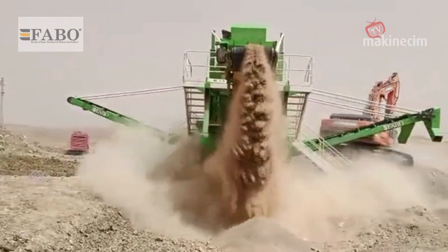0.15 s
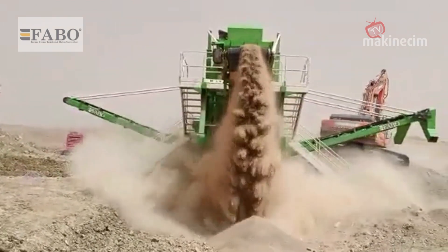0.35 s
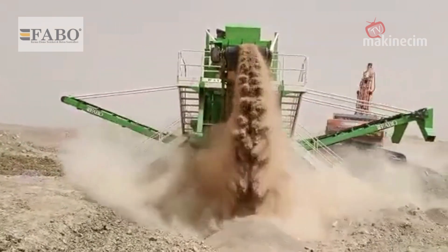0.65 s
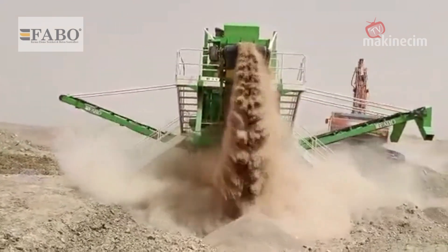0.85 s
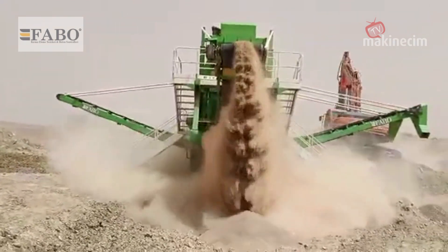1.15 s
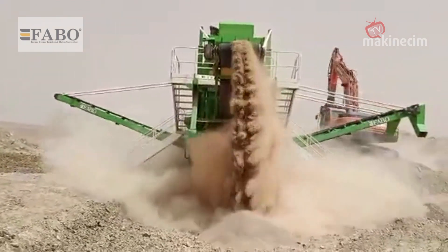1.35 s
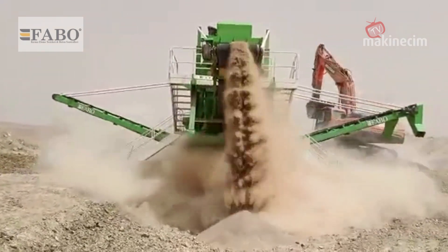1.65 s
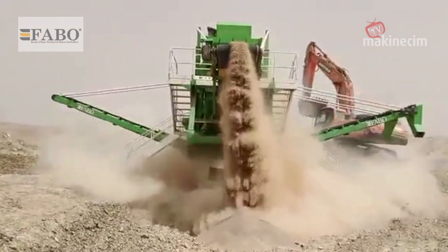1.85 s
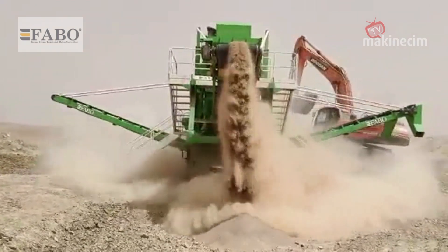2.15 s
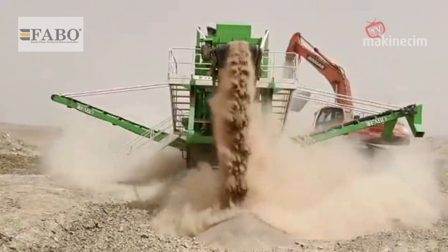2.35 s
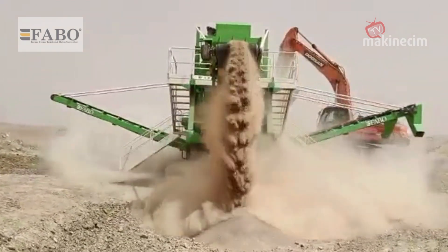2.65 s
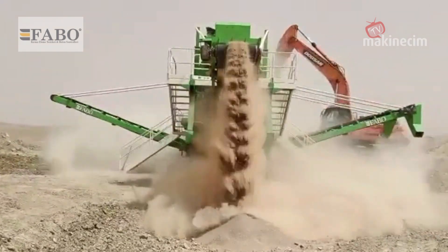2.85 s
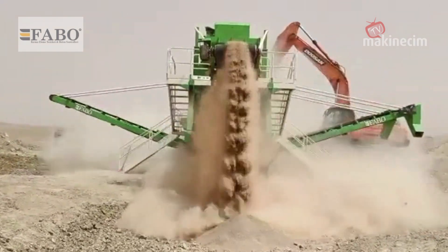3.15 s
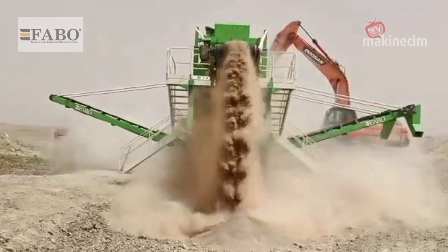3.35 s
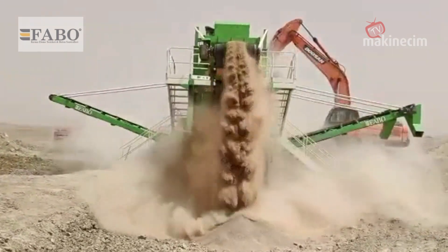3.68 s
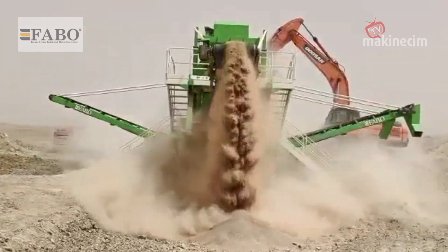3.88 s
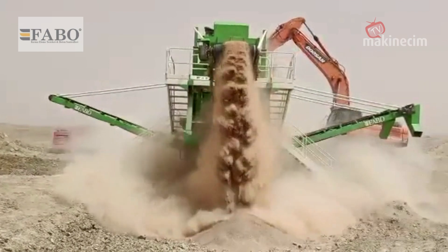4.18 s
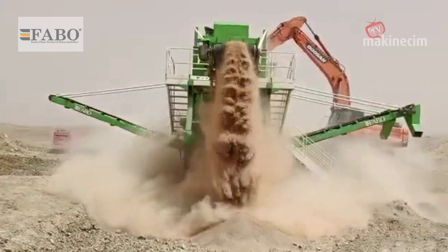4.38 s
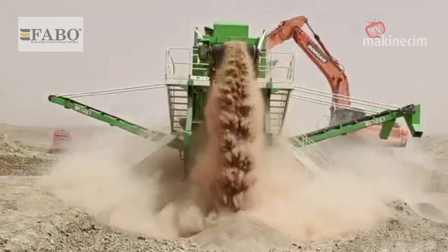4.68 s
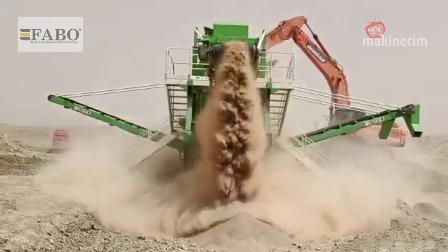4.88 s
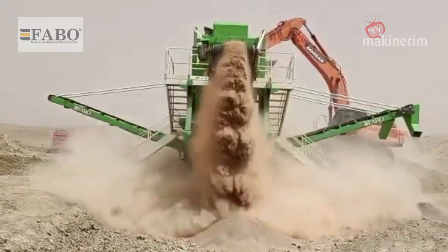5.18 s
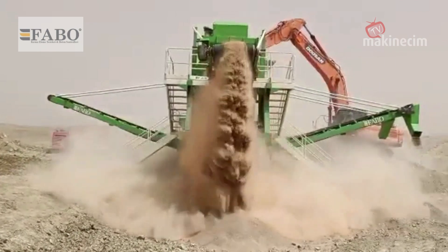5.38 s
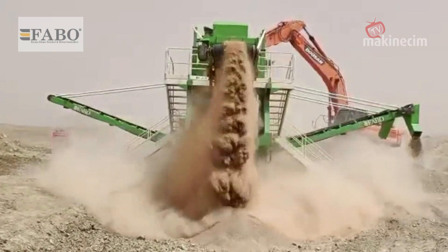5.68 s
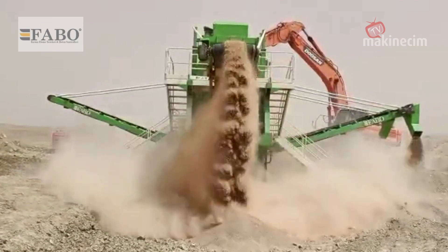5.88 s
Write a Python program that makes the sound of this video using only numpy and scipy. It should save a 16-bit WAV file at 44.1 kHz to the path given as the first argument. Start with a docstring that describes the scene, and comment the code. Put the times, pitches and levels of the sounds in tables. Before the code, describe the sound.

For about six seconds, gravel and sand pour continuously onto a heap in an open quarry. The stream is close on the left, a dense midrange clatter with bright sandy hiss; on the right it is faint, swelling and ebbing. Behind it a screening plant drones softly, its steel panels ringing. Larger stones clack sharply on the left, notably near 0.9, 1.3, 2.0, 2.2, 3.4, 3.7 and 5.7 s. Wind rumbles on both microphone sides: left thumps cluster from 0.1 to 0.5 s, then hard right-side blows near 1.4, 1.9 and 2.1-2.3 s. After a calmer moment around 2.5 s, crowded buffeting returns from 3.0 to 3.7 s and 4.0 to 5.4 s, with a strong left thump near 4.6 s and heavy right ones around 5.0 and 5.9 s. The pour brightens slightly at the end, still running. Dry and open, with only faint ground reflections.

```python
"""Gravel and sand pour off a conveyor onto a heap in an open quarry, close on the left, faint on the right.
Dense random impacts, shaped in colour, make the pour; its level swells and ebbs, mostly on the right,
and big stones clack. Behind it the screening plant drones: knocks keep narrow resonances ringing.
Filtered noise makes a steady breeze on the two microphone ports; gusts and pressure pulses buffet them,
the right one harder."""
import sys
import numpy as np
from scipy import signal
from scipy.fft import rfft, irfft
from scipy.io import wavfile
from scipy.ndimage import uniform_filter1d, minimum_filter1d

SR = 44100
rng = np.random.default_rng(int(sys.argv[2]) if len(sys.argv) > 2 else 0)


def transcribe(u):
    """Save the signal u as a 16-bit wav file named by the first command-line argument.

    u: samples, shape (n,) or (channels, n), limited to [-1, 1]; the rate is SR.
    q: integer samples, one column per channel.
    """
    v = np.clip(np.atleast_2d(u).T, -1, 1)
    q = np.round(v * 32767).astype(np.int16)
    wavfile.write(sys.argv[1], SR, q)


N = 265923
TIME = np.arange(N) / SR  # s
HZ = np.maximum(np.arange(N // 2 + 1) * SR / N, 1)  # frequencies of the spectrum

# Colour of stones on the heap. Each row: frequency in Hz, relative level per hertz in dB.
GRAVEL_SPECTRUM = [(200, -25), (450, 3), (780, 1), (980, 0.5), (1600, 1), (2100, -2.5), (2500, -11.5),
                   (3300, -7), (6000, -38)]
# Colour of the sand. Each row: frequency in Hz, relative level per hertz in dB.
SAND_SPECTRUM = [(1500, -4.5), (2400, 1.5), (3000, -1.5), (3700, 1), (4720, 1), (4810, -8), (5900, -8.5),
                 (6780, -1.5), (6950, -6), (7620, -7.5), (7740, -17.5), (8450, -18.5), (8800, -70)]
# Colour of the top of the hiss. Each row: frequency in Hz, relative level per hertz in dB.
HISS_TOP_SPECTRUM = [(11450, -32), (11650, 3.5), (12800, -1.5), (13100, 7.5), (15650, 6), (15850, -23.5)]
# The steady pour under the swells. Each row: time in seconds, then the gain in dB before the trims in scene()
# of the gravel on the left, the sand on the left, the whole stream on the right.
POUR_LEVELS = [(0, -24.5, -22, -49), (0.6, -25, -24.5, -50.5), (1.6, -26.5, -24.5, -46.5),
               (2.2, -26, -21.5, -44.5), (3.4, -25.5, -22, -45), (4.1, -24.5, -21.5, -45.5),
               (5.5, -25.5, -22, -44.5), (6.03, -23, -18, -45.5)]
# The pour swells and ebbs, mostly on the right; some rows lower a part of it. Each row: crest in seconds,
# rise in seconds, fall in seconds, change of the left gravel in dB, of the left sand in dB, of the right in dB.
LEVEL_SWELLS = [(0.212, 0.037, 0.12, 4.5, -1.5, 4), (0.865, 0.025, .03, 0, -1.5, -3),
                (0.96, 0.059, 0.18, 6, -0.5, -1.5), (1.22, 0.96, 0.23, 3, 2.5, 10.5),
                (1.35, 0.18, 0.049, 1, 2, 16), (1.7, 0.089, 0.15, 6, 5.5, 18.5),
                (1.81, 0.1, 0.17, 3, 1, 12), (2.026, 0.086, 0.1, 0.5, 0.5, 10),
                (2.325, 0.049, 0.035, 1.5, 2.5, -1), (2.47, 0.12, 0.1, 2, 2, -6),
                (2.7, 0.29, 0.077, 3, -0.5, 17), (2.98, 0.077, 0.087, 2.5, 4.5, 9),
                (3.665, 0.039, 0.061, -0.5, 3.5, 3), (3.955, 0.12, 0.1, 4, 2, 15),
                (4.03, 0.12, 0.17, 5, 0.5, -1), (4.29, 0.12, 0.095, 2, 4.5, 10),
                (4.595, 0.068, 0.034, 2.5, 7, 0), (4.845, 0.022, 0.13, 2, 5, 4),
                (5.0, 0.085, 0.15, 3, 3.5, 10.5), (5.132, 0.052, 0.13, 4, 3, 7),
                (5.393, 0.14, 0.2, 2.5, 2.5, 0), (5.745, 0.14, 0.097, 3.5, 1.5, 19)]
# Brief changes of the pour on the left, nearly all dips.
# Each row: time in seconds, depth in dB, fall in seconds, recovery in seconds.
POUR_DIPS = [(0.15, 3, 0.17, 0.041), (0.269, 3.5, 0.035, 0.086), (0.885, 4, 0.011, 0.15),
             (0.988, 5.5, 0.029, 0.11), (1.44, 1, .04, 0.076), (1.5, -0.5, .01, 0.036),
             (1.62, 2.5, 0.049, 0.049), (1.79, 4, 0.048, 0.059), (2.25, 2.5, 0.048, 0.063),
             (2.83, 4, 0.0079, 0.081), (3.28, 2.5, 0.018, 0.067), (3.585, 3.5, 0.078, 0.073),
             (4.375, 2.5, 0.028, .1), (4.455, 4.5, 0.028, 0.086), (4.618, 6, 0.009, 0.072),
             (4.68, 6, .05, 0.11), (4.818, 6.5, 0.036, .016), (5.315, 3, 0.024, 0.09),
             (5.825, 1.5, .015, 0.027), (5.94, 4, 0.017, 0.07)]
# Faint reflections off the ground and the heap. Each row: delay in seconds, sway in seconds, level in dB.
REFLECTIONS = [(0.00426, 0.00008, -22), (0.0077, 0.0002, -23), (0.0119, 0.00025, -22),
               (0.0183, 0.0003, -21)]
# Panels of the shaking screen box. Each row: pitch in Hz, width in Hz, relative level in dB.
PANEL_MODES = [(534, 34, 30.5), (590, 25, 33), (919, 12, 19), (1304, 5.1, 23.5), (1614, 8, 8),
               (1890, 9, 11.5), (2114, 7.3, 13)]
# Wind streaming over the ports. Each row: time in seconds, then the flow level in dB
# on the left and on the right, before the trims in scene().
BREEZE_FLOW = [(0, -18.5, -29), (0.25, -17, -23), (0.6, -15.5, -19), (1.0, -18.5, -21), (1.2, -21, -20),
               (1.38, -19.5, -18), (1.55, -23.5, -33), (1.73, -20.5, -27), (2.15, -26.5, -24),
               (2.45, -25.5, -29.5), (2.65, -22, -25.5), (2.92, -20.5, -24.5), (3.25, -18, -20.5),
               (3.72, -17, -22.5), (3.86, -26, -21.5), (4.25, -22, -23), (4.55, -19, -24), (4.94, -21, -30),
               (5.15, -21.5, -22), (5.47, -19.5, -31), (5.57, -19.5, -19.5), (5.67, -23.5, -30),
               (5.85, -16, -19), (6.03, -23, -21)]
# Kicks of wind, each on one port. Each row: time in seconds, peak in dB before the port's rounding,
# upper edge in Hz, treble spit in dB before its filters and trim, port (0 left, 1 right).
WIND_POPS = [(0.112, -10, 300, -42, 0), (0.138, -9, 432, -40, 0), (0.16, -6, 420, -40, 1),
             (0.17, -8, 560, -40, 0), (0.204, -6, 430, -40, 0), (0.221, 1, 620, -31, 1),
             (0.244, 1, 430, -40, 0), (0.381, 1, 490, -38, 0), (0.396, -2, 550, -30, 1),
             (0.446, -7, 390, -40, 1), (0.45, 0, 580, -40, 0), (0.475, -20, 760, -36, 0),
             (0.531, -2, 705, -18, 1), (0.722, -10, 380, -42, 0), (0.76, -7, 380, -38, 1),
             (0.877, -6.5, 450, -40, 0), (0.94, -10, 600, -38, 0), (0.944, -0.5, 260, -42, 1),
             (0.957, -8, 378, -38, 1), (0.974, -5, 475, -40, 0), (1.116, -9, 390, -44, 0),
             (1.364, 0, 480, -30, 1), (1.377, 2, 850, -28, 1), (1.386, -11, 520, -36, 1),
             (1.448, -9, 760, -34, 1), (1.463, -3, 890, -34, 1), (1.772, -8, 700, -39, 0),
             (1.814, -1, 520, -40, 1), (1.851, -3, 800, -38, 1), (1.863, 1, 402, -44, 1),
             (1.879, -5, 394, -40, 1), (1.891, -3, 555, -34, 1), (1.921, 0, 600, -36, 1),
             (2.075, -3, 470, -34, 1), (2.104, 0, 1390, -28, 1), (2.213, -3, 680, -32, 1),
             (2.228, -2, 766, -23, 1), (2.25, -12, 380, -42, 0), (2.329, -6, 700, -14, 1),
             (2.35, 3, 760, -26, 1), (2.705, -13, 320, -42, 1), (2.734, -5, 405, -40, 1),
             (2.8, -8, 435, -39, 1), (2.828, -7, 400, -42, 0), (2.834, -10, 410, -42, 1),
             (2.97, -8, 300, -44, 1), (3.007, -7, 900, -24, 1), (3.02, -10, 570, -36, 1),
             (3.062, 2, 380, -31, 1), (3.07, -1, 810, -25, 1), (3.074, -9, 600, -38, 0),
             (3.123, -10, 560, -42, 0), (3.166, -7, 1100, -31, 1), (3.205, -11, 440, -40, 0),
             (3.242, -5, 330, -40, 0), (3.254, -11, 490, -40, 1), (3.269, -10, 320, -42, 0),
             (3.295, -7, 1100, -32, 1), (3.306, -10, 700, -28, 1), (3.363, -10, 580, -36, 1),
             (3.406, -6, 500, -21, 1), (3.424, -2, 910, -27, 1), (3.447, -8, 510, -34, 0),
             (3.468, -6, 520, -29, 1), (3.48, -5, 780, -27, 1), (3.49, -7, 700, -19, 1),
             (3.506, -7, 400, -40, 0), (3.53, -5, 390, -40, 1), (3.568, -8, 550, -36, 1),
             (3.602, -7, 350, -42, 0), (3.633, -6, 380, -32, 1), (3.662, -3, 510, -36, 1),
             (3.956, -3, 544, -36, 1), (3.971, -12, 620, -26, 1), (4.013, -8, 450, -38, 1),
             (4.034, -6, 720, -30, 1), (4.064, 1, 447, -30, 1), (4.097, -11, 660, -32, 1),
             (4.111, -5, 490, -40, 1), (4.204, -6, 760, -34, 1), (4.33, 0, 750, -23, 1),
             (4.388, -8, 380, -35, 0), (4.408, -7, 460, -28, 1), (4.434, -5, 800, -32, 0),
             (4.47, 3.5, 1100, -20, 1), (4.615, 0, 1550, -24, 0), (4.649, -4, 1160, -24, 1),
             (4.658, -4, 1000, -32, 0), (4.677, -2, 360, -42, 0), (4.709, -12, 467, -23, 1),
             (4.744, -3, 1030, -18, 1), (4.799, -2, 900, -25, 1), (4.808, -3, 450, -38, 0),
             (4.84, -7, 496, -40, 1), (5.031, 4, 560, -26, 1), (5.06, -5, 824, -28, 1),
             (5.078, -3.5, 640, -32, 1), (5.124, -4, 640, -32, 1), (5.164, -15, 590, -36, 1),
             (5.195, -2, 584, -30, 1), (5.224, -6, 460, -38, 1), (5.305, -6, 520, -42, 0),
             (5.351, 0, 710, -32, 1), (5.392, -2, 1100, -26, 1), (5.423, -4, 670, -33, 1),
             (5.556, -6, 600, -38, 0), (5.77, 0, 806, -30, 1), (5.879, 6, 550, -37, 1),
             (5.91, -4, 478, -20, 1), (5.934, -5, 517, -40, 0)]
# Gusts striking the ports. Each row: start in seconds, length in seconds, left level in dB, right level in dB,
# upper edge in Hz; levels and edges are before the trims in scene().
PORT_GUSTS = [(0.127, 0.058, -13, -21, 594), (0.184, 0.1, -16, -18, 750), (0.315, 0.13, -11, -14.5, 800),
              (0.487, 0.1, -18, -16.5, 750), (0.74, 0.061, -27.5, -14.5, 480),
              (0.906, 0.076, -16, -19.5, 600), (1.187, 0.041, -17, -11.5, 420),
              (1.369, 0.02, -31, -14, 750), (1.438, 0.032, -25, -8.5, 850), (1.769, 0.044, -12.5, -23, 600),
              (1.841, 0.061, -37, -11.5, 623), (2.017, 0.064, -14, -23, 550), (2.08, 0.034, -39, -5, 950),
              (2.199, 0.035, -16, -10, 750), (2.323, 0.0385, -32, -12, 854), (2.694, 0.052, -28, -7, 293),
              (2.776, 0.054, -23, -11.5, 620), (3.003, 0.015, -29, -7, 900), (3.049, 0.044, -10, -9, 664),
              (3.11, 0.26, -22.5, -19.5, 856), (3.396, 0.13, -28, -18.5, 860), (3.549, 0.2, -32, -14, 710),
              (3.942, 0.043, -41, -6.5, 420), (3.977, 0.14, -36, -14.5, 1050),
              (4.183, 0.083, -20, -15.5, 990), (4.297, 0.035, -29, -11.5, 520),
              (4.347, 0.043, -12, -11.5, 865), (4.382, 0.051, -10, -28, 445),
              (4.441, 0.059, -13, -14, 1100), (4.61, 0.015, -6, -34, 1310), (4.633, 0.047, -12, -15, 706),
              (4.69, 0.032, -22, -9, 706), (4.753, 0.06, -13.5, -26, 447), (4.822, 0.085, -31, -17.5, 860),
              (4.996, 0.11, -28, -17, 705), (5.15, 0.042, -29, -13, 1100), (5.192, 0.053, -34, -13, 520),
              (5.285, 0.035, -11, -21, 600), (5.307, 0.13, -38, -16, 755), (5.75, 0.056, -20, -12, 990),
              (5.832, 0.11, -18, -12.5, 580)]
GUST_ATTACK_S, GUST_RELEASE_S = 0.015, 0.01
# Bigger stones landing. Each row: time in seconds, peak in dB, pitch in Hz, decay in seconds.
STONE_CLACKS = [(0.195, -13, 4000, .008), (0.851, -11.5, 3830, 0.016), (1.067, -12.5, 4200, .005),
                (1.078, -21, 3950, .008), (1.337, -8, 4600, .012), (1.349, -12, 4500, .008),
                (1.351, -12, 6700, .004), (1.484, -13, 3900, .008), (1.985, -9, 4040, 0.005),
                (2.211, -7, 4400, 0.0044), (2.301, -10, 6800, 0.014), (2.808, -11, 4200, .005),
                (3.364, -7.5, 3980, 0.012), (3.371, -5, 4200, 0.0085), (3.527, -11, 4250, .006),
                (3.669, -8, 4100, 0.0089), (3.701, -11, 3900, .008), (4.837, -17, 4360, .009),
                (5.081, -12, 3580, .012), (5.657, -5, 4240, .007), (5.742, -8, 3970, 0.0077),
                (5.754, -9, 3800, .008)]
CLACK_GRIT_DB = -5
# Slow shoves of air on the right. Each row: time in seconds, peak in dB.
AIR_HEAVES = [(0.87, -31), (1.26, -29), (2.22, -31), (3.965, -19), (4.325, -23), (4.71, -30)]
HEAVE_HZ, HEAVE_WIDTH_S = 36, 0.02
LIMIT, CUTOFF_HZ = 0.82, 16000  # limiter ceiling in full scale, treble cut


def from_db(db):
    """Decibels to gain."""
    return 10 ** (np.asarray(db) / 20)


def rms_one(x):
    """Scale to unit power."""
    return x / np.sqrt(np.mean(x ** 2) + 1e-20)


def butter(x, order, hz, kind):
    """Causal low-pass or high-pass."""
    sections = signal.butter(order, np.clip(hz, 10, SR / 2 - 1000), kind, fs=SR, output="sos")
    return signal.sosfilt(sections, x)


def in_time(rows):
    """Each column after the time column as a curve over time."""
    times, *columns = np.transpose(rows)
    return np.array([np.interp(TIME, times, column) for column in columns])


def drift(per_s):
    """Smooth chance of spread 1 that changes at about the given rate."""
    return rms_one(irfft(rfft(rng.standard_normal(N)) / (1 + (HZ / per_s) ** 2), N))


def evened(x, size):
    """Keep brief lumps, but hold the power near one over stretches longer than size samples."""
    power = uniform_filter1d(uniform_filter1d(x ** 2, size=size), size=size)
    return x / np.sqrt(np.abs(power) + 1e-12)


def coloured(x, colour):
    """Shape the spectrum by the listed points, with nothing outside them; unit power."""
    hz, db = np.transpose(colour)
    shape_db = np.interp(np.log(HZ), np.log(np.sort(hz)), db, left=-np.inf, right=-np.inf)
    return rms_one(irfft(rfft(x) * from_db(shape_db), N))


def ring(x, hz, width):
    """A resonance, width in Hz; a unit click sets a decaying sine of about height 1 ringing."""
    r, w = np.exp(-np.pi * width / SR), 2 * np.pi * hz / SR
    return signal.lfilter([0, np.sin(w)], [1, -2 * r * np.cos(w), r * r], x + 1e-18)


def grains(per_s, spread_db, clump_db):
    """Random impacts of uneven size and either sign; their strength drifts in clumps."""
    sizes = from_db(spread_db * np.minimum(rng.exponential(1, N), 4))
    signs = rng.choice([-1, 1], N)
    landed = rng.random(N) < per_s / SR
    return sizes * signs * landed * from_db(clump_db * drift(25))


def gravel():
    """Stones clatter on the heap: dense impacts in the stones' colour."""
    return coloured(grains(per_s=3500, spread_db=1.0, clump_db=1.18), GRAVEL_SPECTRUM)


def sand(top_db):
    """Countless small grains hiss; the same noise gives a faint, wavering treble on top."""
    noise = grains(per_s=14000, spread_db=1.5, clump_db=1.19)
    top_gain = from_db(top_db + 1.0 * drift(15))
    return coloured(noise, SAND_SPECTRUM) + top_gain * coloured(noise, HISS_TOP_SPECTRUM)


def pour_levels():
    """Gains of gravel, sand and right side: swells and dips run evenly in dB over the steady stream."""
    swell_db = 0
    for s, rise, fall, *heights in LEVEL_SWELLS:
        swell_db = swell_db + np.outer(heights, np.interp(TIME, [s - rise, s, s + fall], [0, 1, 0]))
    dip_db = 0
    for s, depth, fall, recovery in POUR_DIPS:
        dip_db = dip_db + np.interp(TIME, [s - fall, s, s + recovery], [0, depth, 0])
    gravel_db, sand_db, right_db = in_time(POUR_LEVELS) + swell_db
    return from_db([gravel_db - dip_db, sand_db - dip_db, right_db])


def shimmer(x, depth_db, per_s, count=12):
    """The mix of stone sizes keeps changing: each band swells and fades on its own."""
    spectrum, centres = rfft(x), np.geomspace(500, 8000, count)
    out = np.zeros(N)
    for band in np.eye(count):
        part = irfft(spectrum * np.interp(HZ, centres, band), N)
        out += part * from_db(depth_db * drift(per_s))
    return out


def with_echoes(x):
    """Near reflections ripple the colour; the ripples shift as the microphone sways."""
    out = x.copy()
    for delay, sway, db in REFLECTIONS:
        out += from_db(db) * np.interp(TIME - delay - sway * drift(0.6), TIME, x)
    return out


def screen_box(sway_db=3):
    """Stones tumbling on the decks keep the steel panels ringing, now one more, now another."""
    knocks = grains(per_s=1500, spread_db=2.5, clump_db=1.5)
    drone = np.zeros(N)
    for hz, width, db in PANEL_MODES:
        drone += from_db(db) * rms_one(ring(knocks * from_db(sway_db * drift(3)), hz, width))
    return rms_one(drone)


def chinks(count=40):
    """Scattered stones each set one of the many bars of the steel frame ringing."""
    hits = grains(per_s=110, spread_db=2, clump_db=0)
    bar = rng.integers(0, count, N)
    pitches = np.linspace(900, 4600, count) + rng.uniform(-38.0, 42.0, count)
    return rms_one(sum(ring(hits * (bar == k), hz, width=9) for k, hz in enumerate(pitches)))


def turbulence(drive, edge_hz, low_hz=70, knee_hz=190):
    """Pressure at a port: it falls gently above the knee and steeply above the edge."""
    body = butter(drive, order=3, hz=low_hz, kind="high")
    body = butter(body, order=1, hz=knee_hz, kind="low")
    return butter(body, order=3, hz=edge_hz, kind="low")


def wind(flow_db, edge_hz, lumpy_db, waver_db):
    """The steady stream over a port gives a lumpy, wavering rumble."""
    lumps = rng.standard_normal(N) * from_db(lumpy_db * drift(130))
    rumble = turbulence(lumps, edge_hz)
    return from_db(flow_db + waver_db * drift(9.1)) * evened(rumble, size=2300)


def pops(low_share, knee_share, spit_s, trail_db, trail_s):
    """A kick of air gives a pressure pulse on one port, two weaker kicks behind it, and a spit of treble."""
    thumps, spits, age = np.zeros((2, N)), np.zeros((2, N)), np.arange(SR // 20) / SR
    noises = rng.standard_normal((len(WIND_POPS), len(age)))
    all_gaps = rng.uniform(0.482, 1, (len(WIND_POPS), 2))
    for (s, db, edge_hz, spit_db, port), white, gaps in zip(WIND_POPS, noises, all_gaps):
        kicks = signal.unit_impulse(len(age))
        trail_at = (np.cumsum(gaps) * trail_s * SR).astype(int)
        kicks[trail_at] += from_db(trail_db * np.array([1, 2])) * np.sign(white[1:3])
        pulse = turbulence(kicks, edge_hz, low_hz=edge_hz * low_share, knee_hz=edge_hz * knee_share)
        start = round(s * SR) - np.argmax(pulse[:SR // 500])  # the first crest lands on time
        side, span = int(port > .5), slice(start, start + len(age))
        thumps[side, span] += np.sign(white[0]) * from_db(db) * pulse / np.abs(pulse).max()
        spits[side, span] += from_db(spit_db) * white * np.exp(-age / spit_s)
    spits = butter(spits, order=2, hz=1100, kind="high")
    spits = butter(spits, order=2, hz=3000, kind="low")
    return thumps + from_db(4.5) * butter(spits, order=12, hz=6500, kind="low")


def gusts(levels_db, spread_db, edge_share, eddy_db, eddies_per_s, lumpy_db):
    """Each gust is a volley of pressure kicks, throbbing with its eddies: attack, hold, release."""
    out = np.zeros(N)
    eddy_rate = eddies_per_s * from_db(4.4 * drift(20.25))
    throb = from_db(eddy_db * np.sin(2 * np.pi * np.cumsum(eddy_rate) / SR))
    kicks = grains(per_s=800, spread_db=spread_db, clump_db=0) * from_db(lumpy_db * drift(200))
    for (start, length, _, _, edge_hz), db in zip(PORT_GUSTS, levels_db):
        near = np.abs(TIME - start - length / 2) < length / 2 + .05
        age = TIME[near] - start
        # the ramps pass half height at the start and the end
        attack, release = .5 + age / GUST_ATTACK_S, .5 + (length - age) / GUST_RELEASE_S
        swell = np.clip(np.minimum(attack, release), 0, 1)
        volley = turbulence(kicks[near], edge_hz * edge_share, low_hz=93.3, knee_hz=189)
        burst = swell * throb[near] * evened(volley, size=1700)
        out[near] += from_db(db) * rms_one(burst) * np.sqrt(np.mean(swell ** 2))
    return out


def clacks(width_hz, grit_db, top_share):
    """A big stone lands with a brief crunch in one broad resonance, and a spray of brighter grit."""
    out, age = np.zeros(N), np.arange(SR // 20) / SR
    noises = rng.standard_normal((len(STONE_CLACKS), len(age)))
    for (s, db, hz, decay_s), white in zip(STONE_CLACKS, noises):
        contact = white * np.exp(-age / decay_s)
        grit = rms_one(butter(contact, order=4, hz=0.57 * hz, kind="high"))
        crunch = rms_one(ring(contact, hz, width_hz)) + from_db(grit_db) * grit
        crunch = butter(crunch, order=24, hz=min(top_share * hz, 7300), kind="low")
        start = round(s * SR)
        out[start:start + len(age)] += from_db(db) * crunch / np.abs(crunch).max()
    return out


def heaves(hz, width_s):
    """A large eddy leans on the port and lets go: about one cycle of very deep pressure."""
    out = np.zeros(N)
    for s, db in AIR_HEAVES:
        age = TIME - s
        out += from_db(db) * np.exp(-(age / width_s) ** 2) * np.cos(2 * np.pi * hz * age)
    return out


def ports(pressure, top=0.51, low_cut_hz=64):
    """The microphone ports shed the deepest bass and round off the strongest peaks."""
    return top * np.tanh(butter(pressure, order=5, hz=low_cut_hz, kind="high") / top)


def scene():
    """The pour and the plant on both sides, with the wind on top."""
    gravel_gain, sand_gain, right_gain = pour_levels()
    drone, frame = screen_box(), chinks()
    left = gravel_gain * (from_db(2.47) * gravel() + from_db(-9.5) * frame)
    left += sand_gain * sand(top_db=-18.0)
    left += from_db(-33.5) * drone
    left = shimmer(left, depth_db=0.74, per_s=16)
    left = with_echoes(left + clacks(width_hz=790, grit_db=CLACK_GRIT_DB, top_share=1.445))

    right = from_db(1.0) * gravel() + from_db(-2.5) * sand(top_db=-15.0)
    right += from_db(-1.5) * drone + from_db(-13.0) * frame
    right = right_gain * right + heaves(HEAVE_HZ, HEAVE_WIDTH_S)

    flow_left, flow_right = in_time(BREEZE_FLOW)
    _, _, gust_left, gust_right, _ = np.transpose(PORT_GUSTS)
    wind_left = from_db(0.8) * wind(flow_left, edge_hz=275, lumpy_db=6.0, waver_db=0.5)
    wind_left += from_db(-3) * gusts(gust_left, spread_db=0.0, edge_share=0.92,
                                     eddy_db=-2.5, eddies_per_s=17, lumpy_db=4.5)
    wind_right = from_db(0.5) * wind(flow_right, edge_hz=537, lumpy_db=3.0, waver_db=2.5)
    wind_right += from_db(-1.0) * gusts(gust_right, spread_db=4.5, edge_share=1.0,
                                        eddy_db=4.0, eddies_per_s=19, lumpy_db=3.0)
    buffeting = np.array([wind_left, wind_right])
    buffeting += pops(low_share=0.23, knee_share=0.44, spit_s=0.0015, trail_db=-7.5, trail_s=0.00544)
    return np.array([left, right]) + ports(buffeting)


def record(dry):
    """A fast limiter holds down the highest peaks; the top is cut steeply."""
    room = np.minimum(1, LIMIT / (np.abs(dry) + 1e-9))
    gain = minimum_filter1d(room, size=221)
    gain = uniform_filter1d(uniform_filter1d(gain, size=111), size=111)
    return irfft(rfft(dry * gain) / np.sqrt(1 + (HZ / CUTOFF_HZ) ** 160), N)


dry = scene()
out = record(dry)
transcribe(out)
```